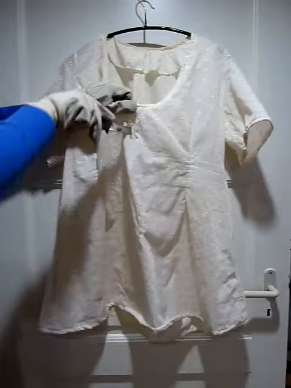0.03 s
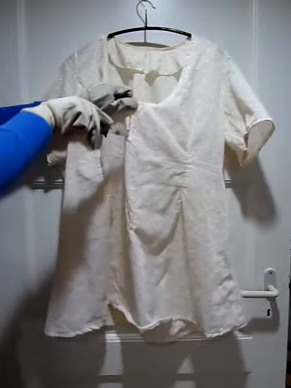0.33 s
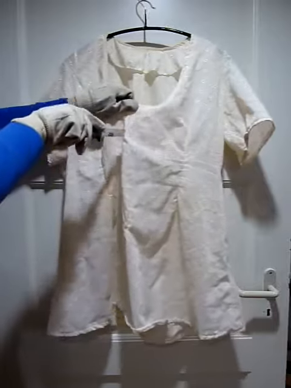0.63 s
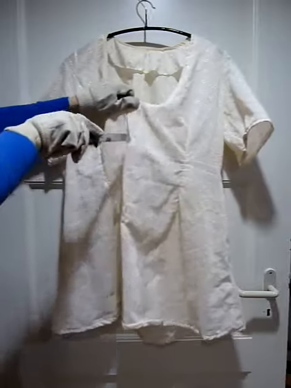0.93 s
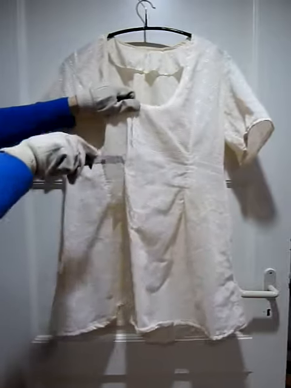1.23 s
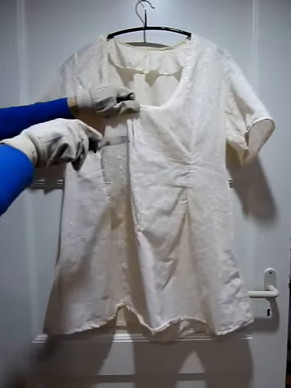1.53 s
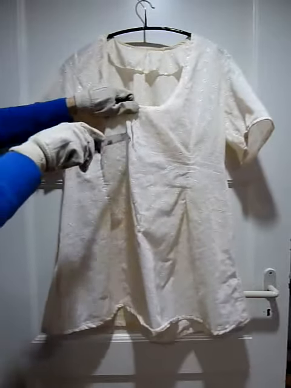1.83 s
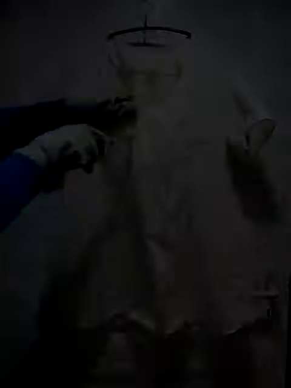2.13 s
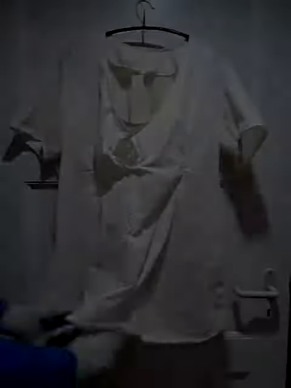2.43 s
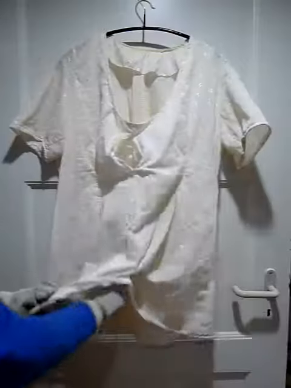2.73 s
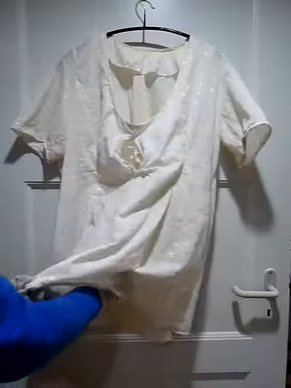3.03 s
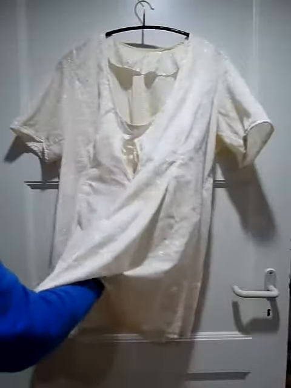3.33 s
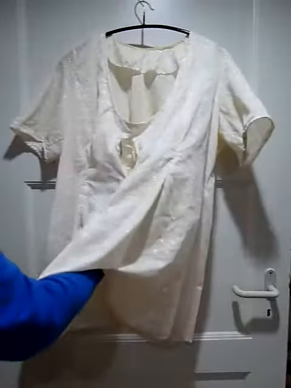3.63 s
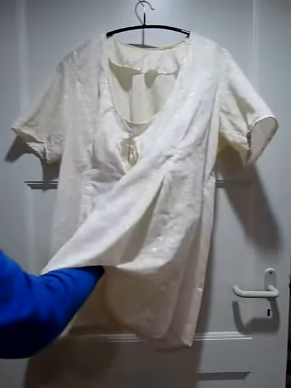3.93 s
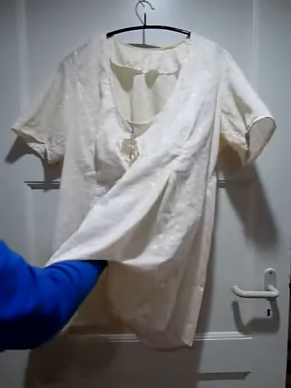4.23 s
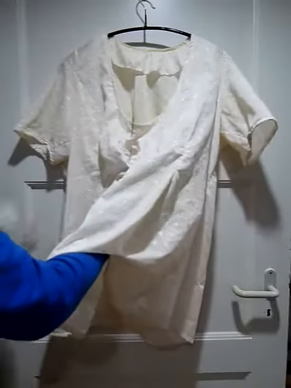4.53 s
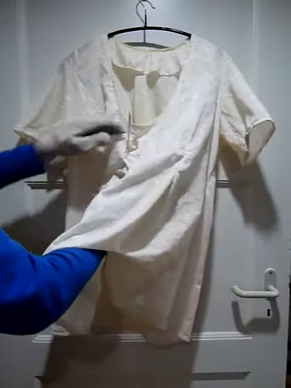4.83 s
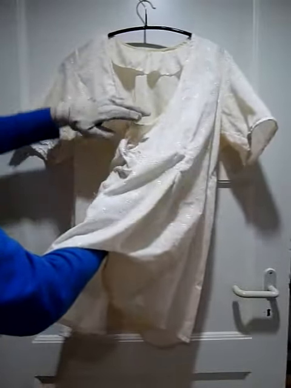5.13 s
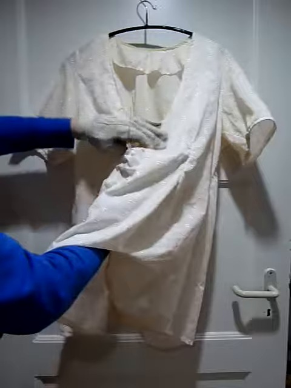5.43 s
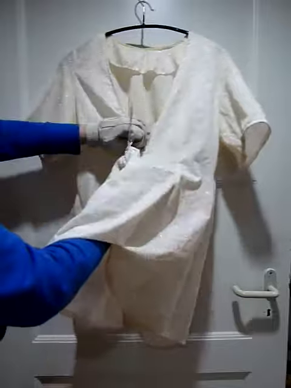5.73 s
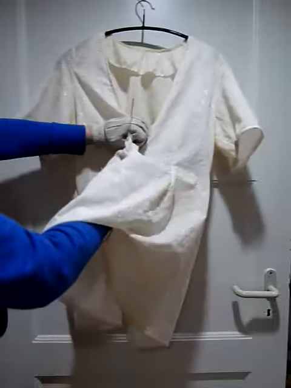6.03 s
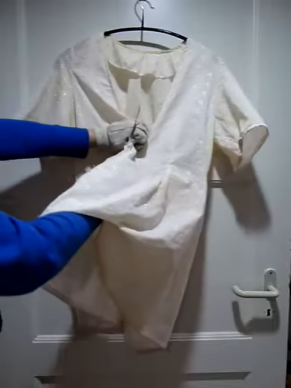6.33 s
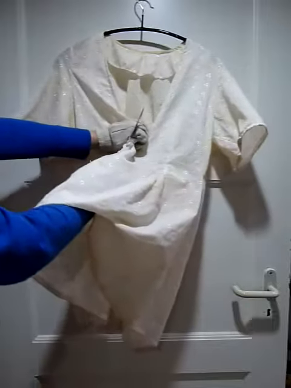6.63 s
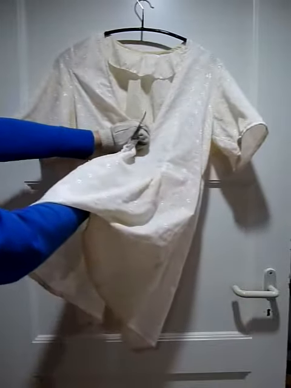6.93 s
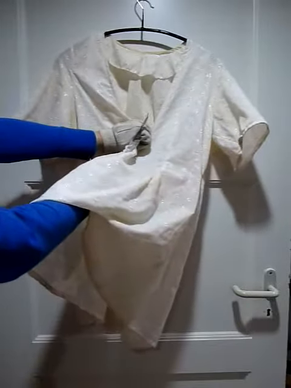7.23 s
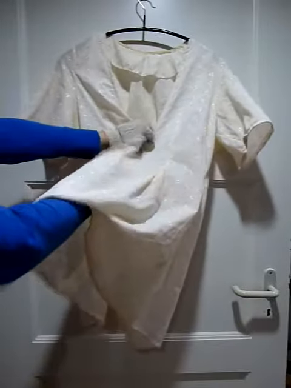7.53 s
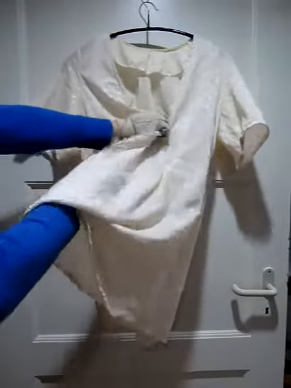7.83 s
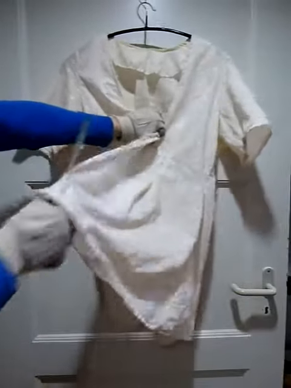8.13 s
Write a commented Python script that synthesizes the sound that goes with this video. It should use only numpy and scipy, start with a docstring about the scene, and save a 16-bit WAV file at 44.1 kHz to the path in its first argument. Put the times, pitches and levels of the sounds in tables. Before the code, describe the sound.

In a small room, scissors are handled with a quick cluster of metallic clacks, their loose blades knocking and rattling. Several seconds of steady, quiet hiss follow, with barely audible rustles and tiny squeaks. Near the end the blade ticks lightly, then snaps through a taut hem with a soft thud against a door, and the cloth rips in a short crackle of breaking threads. One microphone picks up brief reflections from near walls.

```python
"""A small room, one microphone, a blouse hanging on a door. First the scissors clack as they are handled:
loose blades knock, rattle and seat. Later the blade snaps through the taut hem, the door thuds, and the
cloth rips in a run of breaking threads that set the stretched fabric fluttering. Near walls answer each
sound. Behind it all lie a steady hiss, a few tiny squeaks and, for a while, a faint whine."""
import sys
import numpy as np
from scipy import signal
from scipy.fft import rfft, irfft
from scipy.io import wavfile
from scipy.ndimage import uniform_filter1d

SR = 44100
rng = np.random.default_rng(int(sys.argv[2]) if len(sys.argv) > 2 else 0)


def wav_out(sig):
    """Save sig, one row per channel (or a flat mono array), as 16-bit PCM at SR to the path in sys.argv[1]."""
    wavfile.write(sys.argv[1], SR, np.round(np.clip(np.atleast_2d(sig).T, -1, 1) * 32767).astype(np.int16))


N = 360738
TIME = np.arange(N) / SR

# strong threads giving way, the hem first: (time [s], level [dB], pluck of the cloth against it [dB])
STRONG_THREADS = [(7.5107, -8, -24), (7.5167, -18, -16), (7.552, -18.5, -1), (7.6676, -27.5, 2.5),
                  (7.767, -24, -11), (7.8204, -23, -1), (7.8284, -15.5, 2.5), (7.8645, -22, -2),
                  (7.883, -24, 5.5), (7.9026, -19, -3), (7.9224, -20.5, 4), (7.983, -19.5, 3.5),
                  (8.048, -22, 10.5), (8.062, -22, 9), (8.111, -23.5, 5)]
# crack of a strong thread: (frequency [Hz], level [dB])
SNAP_SPECTRUM = [(30, -47), (130, -25), (300, -14.5), (650, 2), (1200, 5), (2100, -7), (2800, -3.5),
                 (4300, -4), (6000, -17), (7500, -30.5)]
# resonances of the stretched cloth: (frequency [Hz], level [dB], t60 [s])
CLOTH_MODES = [(298, -11, 0.02), (327, -1.5, .04), (401, 3.5, 0.029), (490, -6.5, 0.026), (583, -4.5, .035)]


def rip(threads_per_s=1400, pops_per_s=140, bunch_db=2.5):
    """Fine threads break in bunches, coarser ones pop among them; the jerks make the taut cloth flutter."""
    # a fine thread breaking: (frequency [Hz], level [dB])
    thread_spectrum = [(30, -48), (130, -19), (300, -3), (550, 3), (800, 3.5), (1200, -1.5), (1600, -8),
                       (2500, 1), (3200, -11), (4300, -10.5), (5500, -14.5), (6600, -20), (7500, -36.5)]
    pull, flutter = tension()
    breaks = unit(grains(threads_per_s, spread_db=3.5) * undb(bunch_db * walk(200)))
    pops = grains(pops_per_s, spread_db=1.6)
    responses = click(thread_spectrum), click(SNAP_SPECTRUM), ring(CLOTH_MODES)
    thread, snap, cloth_ring = (h / np.linalg.norm(h) for h in responses)
    fine = undb(-5) * through(breaks * pull, thread)
    coarse = undb(-3) * through(pops * pull, snap)
    jerks = (undb(-6) * breaks + undb(-5) * pops) * flutter
    cloth = no_bass(through(jerks, cloth_ring), hz=250)
    return room(fine + coarse + cloth, wet_db=-1)


def tension(slacken_db_per_s=14.5, release_s=.0053, surge_db=-22.5, surge_s=.011):
    """Strength of tear and flutter: sudden start, slow slackening, a surge after each snap, a quick stop."""
    # the short cut and the long rip: (start [s], length [s], level [dB], flutter against it [dB])
    tears = [(7.511, 0.087, -32, -8), (7.819, .37, -35.5, -2.5)]
    pull, flutter = np.zeros(N), np.zeros(N)
    for start, length, db, flutter_db in tears:
        age = np.maximum(TIME - start, 0)
        release = np.exp(-np.maximum(age - length, 0) / release_s)
        tear = (age > 0) * undb(db - slacken_db_per_s * age) * release
        pull += tear
        flutter += tear * undb(flutter_db)
        for at, snap_db, pluck_db in STRONG_THREADS:
            if start < at < start + length:
                surge = (TIME > at) * undb(snap_db + surge_db) * np.exp(-np.abs(TIME - at) / surge_s)
                pull += surge
                flutter += surge * undb(pluck_db)
    return pull, flutter


def snaps():
    """Strong threads crack, fray and pluck the cloth; the hem goes cleanly and leaves the blade ringing."""
    # the freed blade: (frequency [Hz], level [dB], t60 [s])
    blade_modes = [(767, -11, 0.3), (1840, 0.5, 0.28), (2400, -15, .2)]
    times, db, pluck_db = np.transpose(STRONG_THREADS)
    hem, threads = blows(times[:1], db[:1]), blows(times[1:], db[1:])
    frayed = threads + undb(-3) * chatter(threads, length_s=.0014)
    cracks = through(room(hem, wet_db=0) + room(frayed, wet_db=-.5), click(SNAP_SPECTRUM))
    plucks = through(blows(times, db + pluck_db), ring(CLOTH_MODES))
    cloth = undb(-16) * no_bass(plucks, hz=260)
    blade = undb(-23) * through(hem, ring(blade_modes))
    return cracks + room(cloth, wet_db=-5) + blade


def scissors(rattle_s=.0038):
    """A dull knock; the loose blades rattle, then seat with a bright, chattering contact that rings them."""
    # handling clacks: (time [s], knock level [dB], contact level [dB], delay until the blades seat [s])
    clacks = [(.527, -26, -25.5, .003), (.6515, -43, -39, 0.0025), (0.6625, -21, -18.5, .0096),
              (.7228, -23, -22.5, .003), (.8575, -20, -17, .0095), (.902, -18.5, -13.5, 0.0044),
              (1.0394, -30, -30.5, 0.0035)]
    # the scissors' dull knock and bright steel ring: (frequency [Hz], level [dB], t60 [s])
    knock_modes = [(407, -7.5, 0.077), (554, -7.5, 0.037), (679, -4.5, 0.056), (910, 6, 0.016),
                   (1144, 7, 0.012), (1470, -14, 0.083)]
    steel_modes = [(1805, -1, 0.054), (2130, -1, 0.083), (2348, -6.5, .06), (2550, 2, .07),
                   (2840, 2, 0.053), (3410, -7, .06), (3870, -12.5, .06), (4000, -7, .06),
                   (4180, -1, 0.065), (4650, -5, 0.043)]
    # blade striking blade: (frequency [Hz], level [dB])
    contact_spectrum = [(30, -57), (140, -27), (350, -5), (900, -0.5), (1600, -1.5), (2500, 5), (3300, 2),
                        (4500, 0), (5300, -10), (6400, -12.5), (7000, -24), (7500, -37)]
    times, knock_db, contact_db, seat_s = np.transpose(clacks)
    loose = np.array([(TIME > at) & (TIME < at + delay) for at, delay in zip(times, seat_s)])

    def rattle(db):
        """Small impacts between knock and seat; each rattle_s of them has the energy of one blow."""
        return grains(2000, spread_db=2.2) * (undb(db) @ loose) / np.sqrt(rattle_s * SR)

    knock = undb(-13) * through(blows(times, knock_db) + rattle(knock_db - 4), ring(knock_modes))
    touch = blows(times, contact_db - 7) + rattle(contact_db - 7)
    seat = blows(times + seat_s, contact_db)
    contact = touch + undb(-4) * seat + undb(-2) * chatter(seat, length_s=.0038)
    clicks = undb(-1) * through(contact, click(contact_spectrum))
    steel = undb(-37) * through(contact, ring(steel_modes))
    return room(no_bass(knock, hz=290), wet_db=-5.5) + room(clicks + steel, wet_db=1.5, early_db=-2.5)


def door(push_s=.0049):
    """Soft bumps set the door panel booming as the hem lets go."""
    # bumps on the door: (time [s], level [dB])
    bumps = [(7.527, -32.5), (7.544, -28.5)]
    # the door panel: (frequency [Hz], level [dB], t60 [s])
    panel_modes = [(64, -14, 0.43), (80, -3.5, 0.2), (186.7, 4, 0.3)]
    push = signal.windows.hann(int(push_s * SR))
    force = through(blows(*np.transpose(bumps)), push / push.sum())
    return through(force, ring(panel_modes))


def handling():
    """The blade ticks lightly as it is set, and fibres brush over each other."""
    # setting the blade: (time [s], level [dB])
    blade_ticks = [(6.811, -33.5), (6.8537, -22.5)]
    # faint brushes of cloth: (time [s], length [s], level [dB])
    brushes = [(0.087, 0.052, -65), (2.005, 0.07, -55.5), (2.52, .14, -66), (6.87, 0.055, -67),
               (7.763, .03, -59)]
    # one blade tick, one fibre slipping: (frequency [Hz], level [dB])
    tick_spectrum = [(200, -4), (1200, 3), (3000, 0.5), (5500, -1), (7500, -20)]
    fibre_spectrum = [(500, -24), (2200, -11), (3000, -1.5), (4000, -3), (5200, -1), (6500, -11),
                      (7500, -21.5)]
    ticks = through(blows(*np.transpose(blade_ticks)), click(tick_spectrum))
    touch = sum(undb(db) * np.exp(-(2 * (TIME - at) / length) ** 2) for at, length, db in brushes)
    rustle = unit(through(grains(2500, spread_db=5.3), click(fibre_spectrum)))
    return room(ticks + touch * rustle, wet_db=-4.5)


def squeaks(half_length_s=.026, waver_hz=70):
    """Brief, rough squeaks, barely above the hiss."""
    # high squeaks: (time [s], pitch [Hz], level [dB])
    events = [(2.03, 2900, -56), (2.13, 2950, -61), (3.37, 2910, -59), (6.07, 3020, -58)]
    wobble = waver_hz * walk(250)
    return sum(undb(db) * np.exp(-((TIME - at) / half_length_s) ** 2) * tone(hz + wobble)
               for at, hz, db in events)


def whine(start_s=3.33, stop_s=6.15, fizz_hz=3080, fizz_t60=.016):
    """Thin wavering tones and a narrow flickering fizz, far down in the background."""
    # tones of the whine: (frequency [Hz], rms level [dB])
    partials = [(1163, -69.5), (1905, -75.5), (2326, -73)]
    fade = uniform_filter1d(1. * ((TIME > start_s) & (TIME < stop_s)), SR // 10)
    tones = sum(np.sqrt(2) * undb(db + 1.9 * walk(14)) * tone(hz + 9 * walk(40)) for hz, db in partials)
    fizz = unit(through(rng.standard_normal(N), ring([(fizz_hz, 0, fizz_t60)])))
    return fade * (tones + fizz * undb(-70 + 2 * walk(18)))


def room_tone(level_db=-51, waver_db=.5):
    """The steady hiss of the room, its level barely wavering."""
    # background noise at the microphone: (frequency [Hz], level [dB])
    spectrum = [(15, -38.5), (25, -9.5), (54, -10), (112, -1), (291, -1.5), (344, -3), (406, -1.5),
                (639, -5.5), (719, -6.5), (791, -6.5), (870, -7.5), (1130, -8.5), (4610, -18.5),
                (6290, -27), (7430, -43), (9660, -71.5), (16300, -120)]
    hiss = unit(through(rng.standard_normal(N), click(spectrum)))
    return hiss * undb(level_db + waver_db * walk(6))


def room(x, wet_db, early_db=-3, t60=.26, treble_t60=.28, gap_s=.003, early_s=.0048):
    """Direct sound reaches the microphone, then reflections off door and near walls, then a short tail."""
    t = TIME[:SR // 2]
    noise = rng.standard_normal(len(t))
    low = signal.sosfilt(signal.butter(2, 3000, fs=SR, output="sos"), noise)
    tail = low * decay(t, t60) + (noise - low) * decay(t, treble_t60)
    early = grains(1600, spread_db=1.7)[:len(t)] * np.exp(-t / early_s)
    tail, early = tail * (t > gap_s), early * (t > gap_s)
    response = tail / np.linalg.norm(tail) + undb(early_db) * early / np.linalg.norm(early)
    return x + undb(wet_db) * through(x, response)


def undb(db):
    """Decibels to gain."""
    return 10 ** (np.asarray(db) / 20)


def unit(x):
    """Scale to rms 1."""
    return x / np.sqrt(np.mean(x ** 2))


def through(x, response):
    """Pass a sound through an impulse response."""
    return signal.fftconvolve(x, response)[:N]


def click(points, size=4096):
    """The sharpest causal pulse with a (frequency [Hz], level [dB]) spectrum, peak 1."""
    hz, db = np.transpose(points)
    bin_hz = np.maximum(np.arange(size // 2 + 1) * SR / size, 1)
    gain = undb(np.interp(np.log(bin_hz), np.log(hz), db))
    cepstrum = irfft(np.log(gain))
    cepstrum[1:size // 2] *= 2  # fold onto positive time for minimum phase
    cepstrum[size // 2 + 1:] = 0
    pulse = irfft(np.exp(rfft(cepstrum)))
    return pulse / np.abs(pulse).max()


def decay(t, t60):
    """A fall of 60 dB every t60 seconds."""
    return np.exp(-np.log(1000) * t / t60)


def ring(modes):
    """Fading sines of a struck object."""
    t = TIME[:SR // 2]
    return sum(undb(db) * np.sin(2 * np.pi * hz * t) * decay(t, t60) for hz, db, t60 in modes)


def tone(hz):
    """A sine that follows a moving pitch."""
    return np.sin(2 * np.pi * np.cumsum(hz) / SR)


def blows(times, db):
    """One impulse for each event."""
    out = np.zeros(N)
    np.add.at(out, (np.asarray(times) * SR).astype(int), undb(db))
    return out


def walk(per_s):
    """A smooth random wander, rms 1."""
    hold = int(SR / per_s)
    steps = np.repeat(rng.standard_normal(N // hold + 1), hold)
    return unit(uniform_filter1d(steps, hold)[:N])


def grains(per_s, spread_db):
    """Random impulses of uneven size, rms 1."""
    size = undb(spread_db * np.clip(rng.standard_normal(N), -2, 2))
    return unit((rng.random(N) < per_s / SR) * size * rng.choice([-1, 1], N))


def chatter(x, length_s):
    """Each impulse breaks up into a quick fading run of smaller ones, of about the same energy."""
    slips = grains(4000, spread_db=2)
    return through(x, np.exp(-TIME[:SR // 10] / length_s)) * slips / np.sqrt(length_s * SR / 2)


def no_bass(x, hz):
    """Small or light things radiate little below this pitch."""
    return signal.sosfilt(signal.butter(3, hz, "high", fs=SR, output="sos"), x)


def scene():
    """Everything as it reaches one microphone."""
    return (scissors() + rip() + snaps() + door() + handling() + room_tone() + whine() + squeaks())[None]


def record(dry):
    """A narrow-band recorder cuts the top steeply."""
    top_hz = 7400
    return signal.sosfilt(signal.ellip(10, .2, 70, top_hz, fs=SR, output="sos"), dry)


dry = scene()
out = record(dry)
wav_out(out)
```